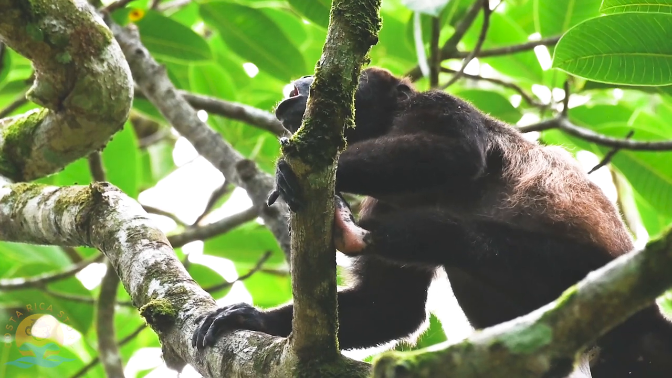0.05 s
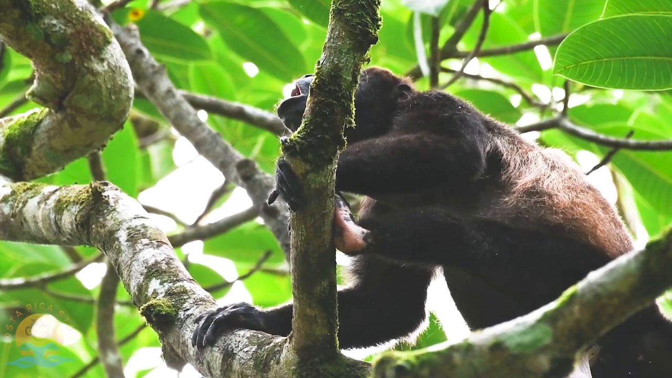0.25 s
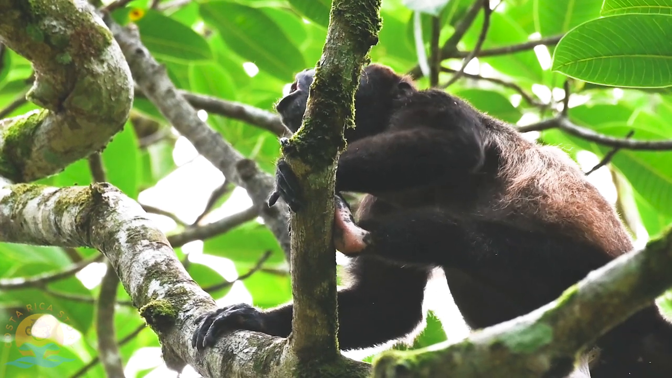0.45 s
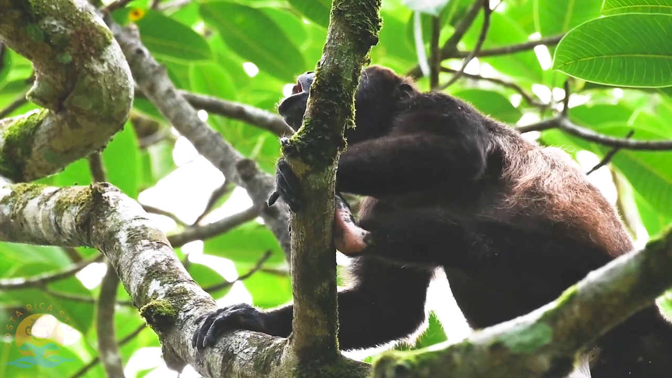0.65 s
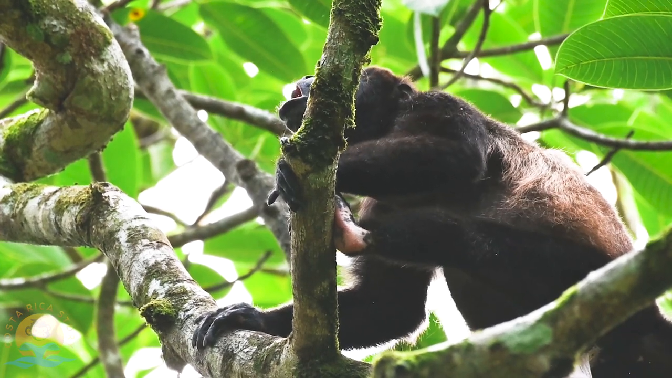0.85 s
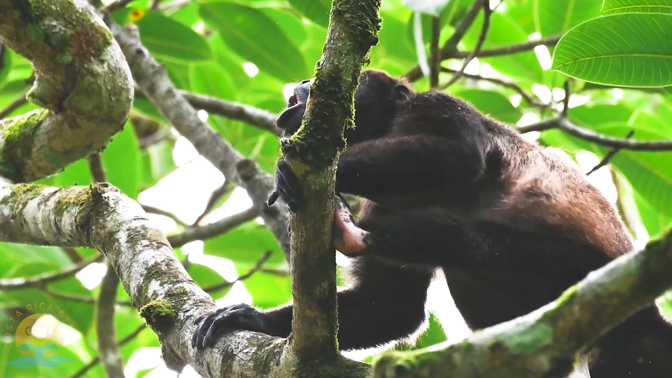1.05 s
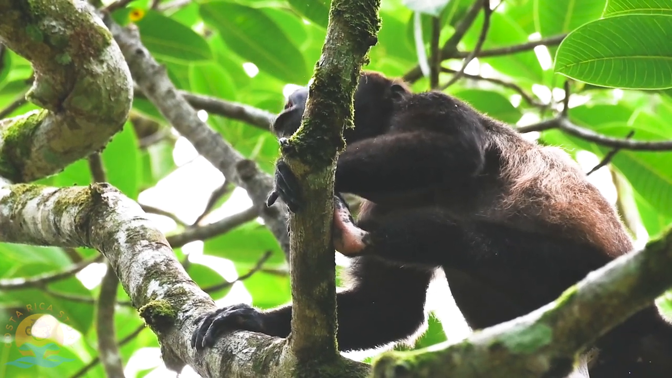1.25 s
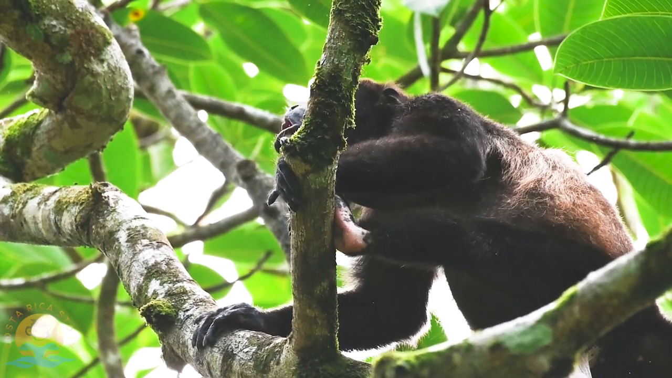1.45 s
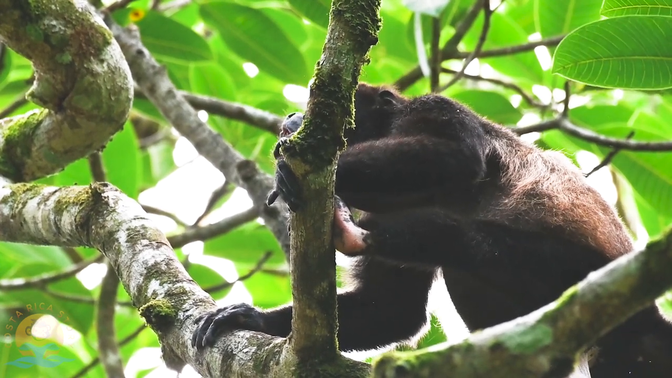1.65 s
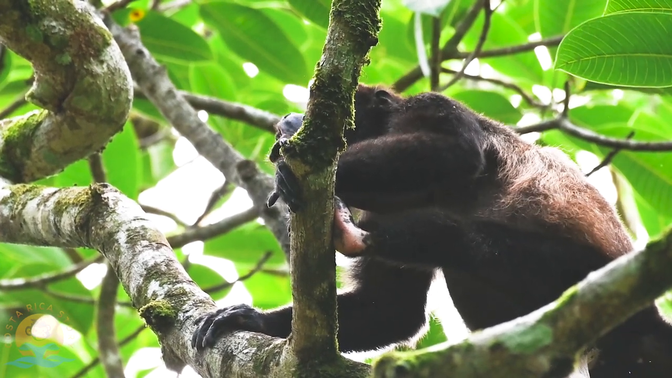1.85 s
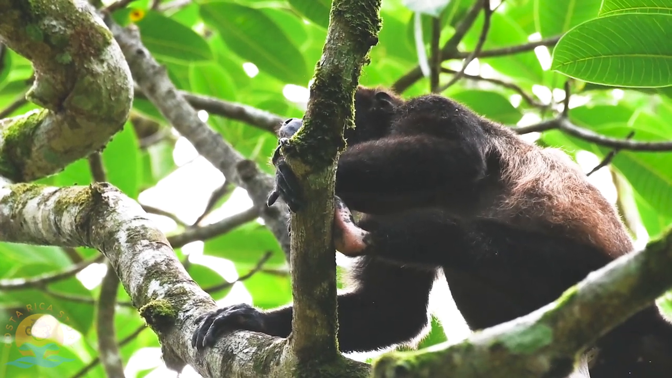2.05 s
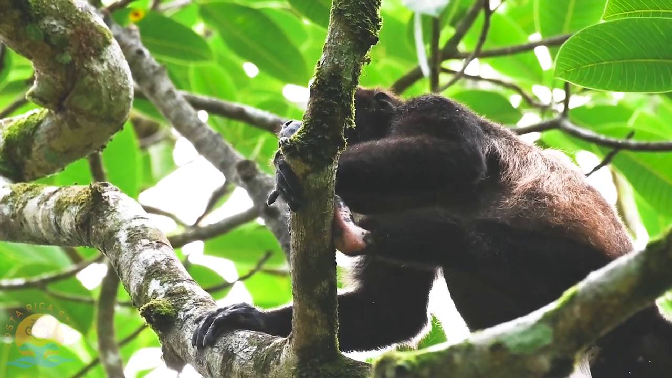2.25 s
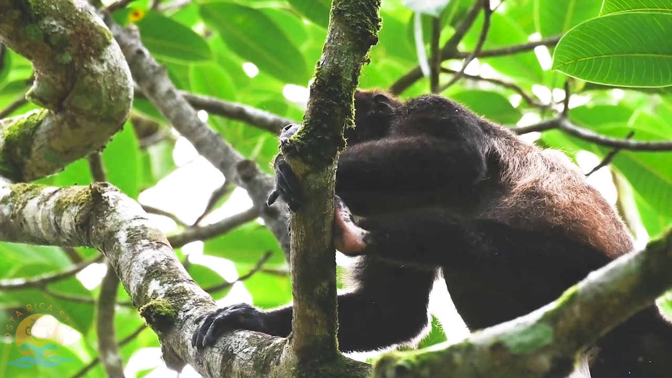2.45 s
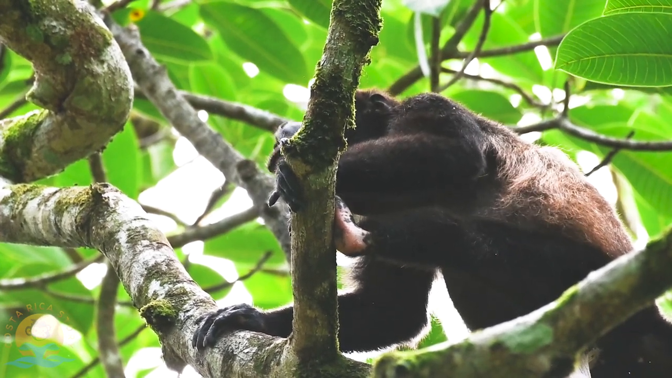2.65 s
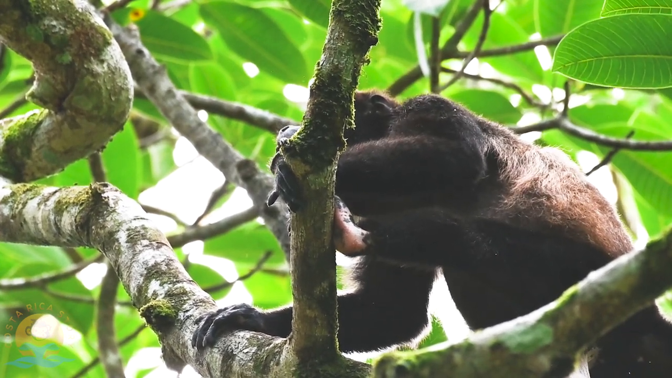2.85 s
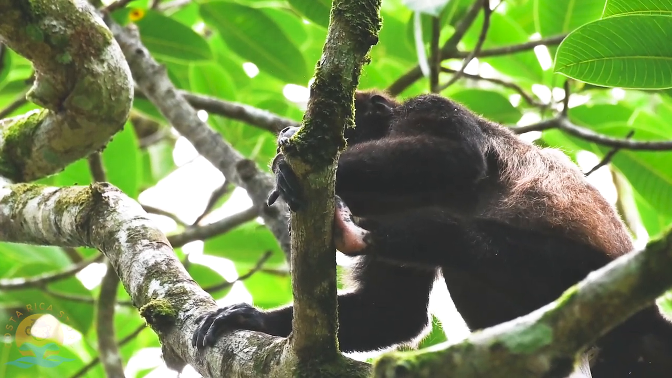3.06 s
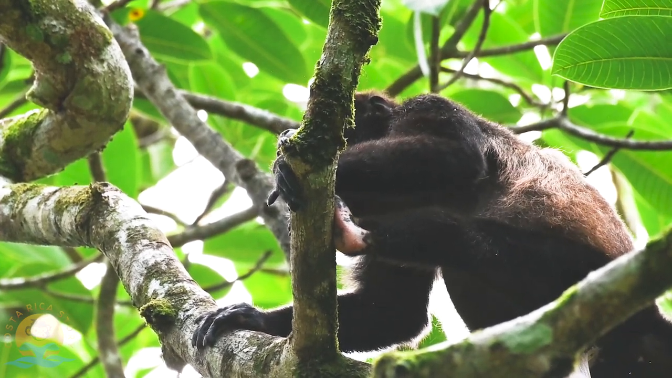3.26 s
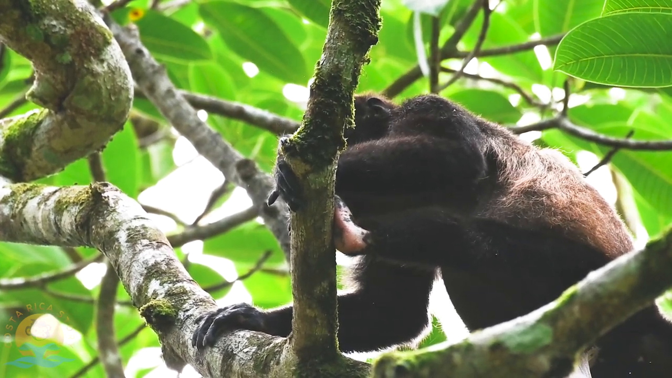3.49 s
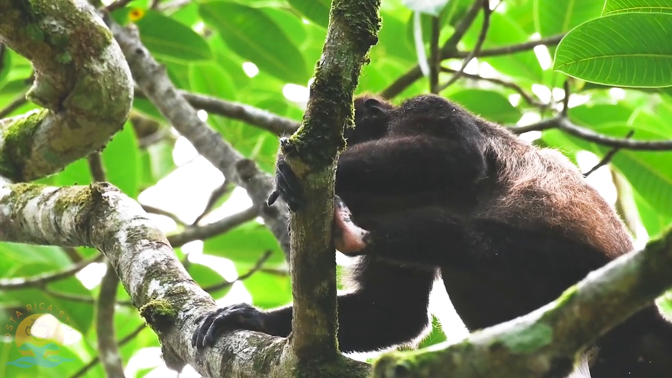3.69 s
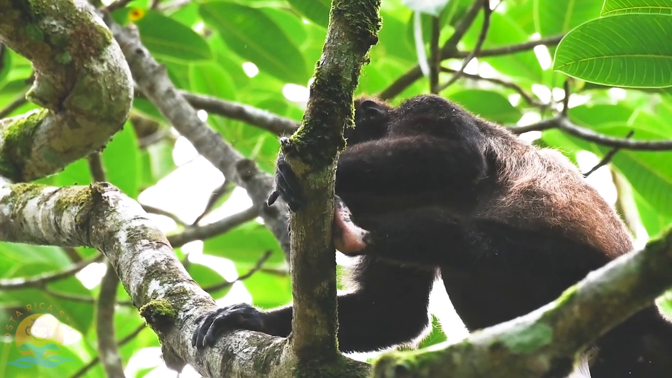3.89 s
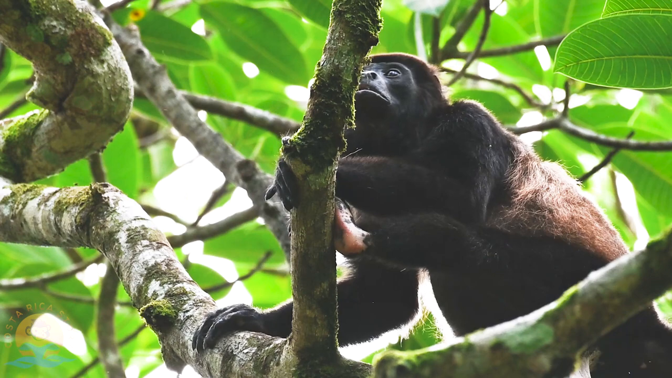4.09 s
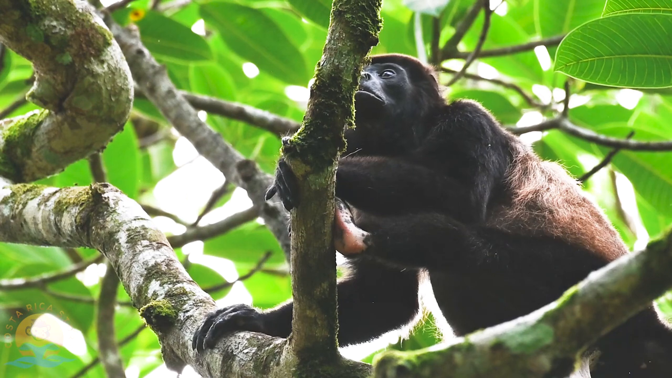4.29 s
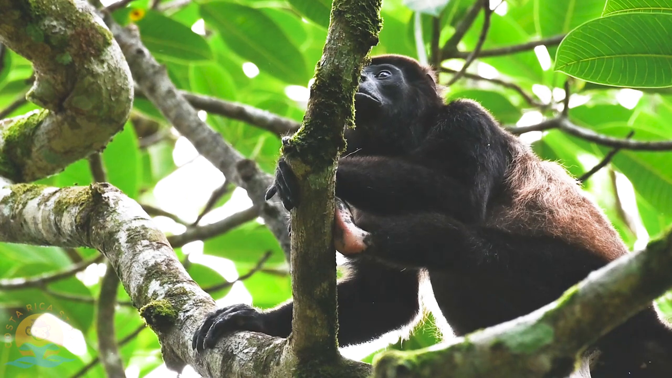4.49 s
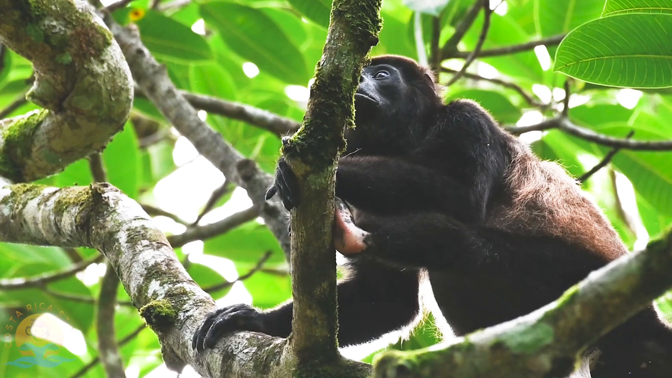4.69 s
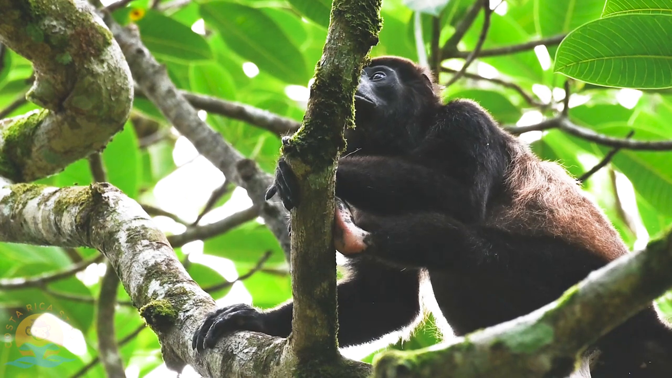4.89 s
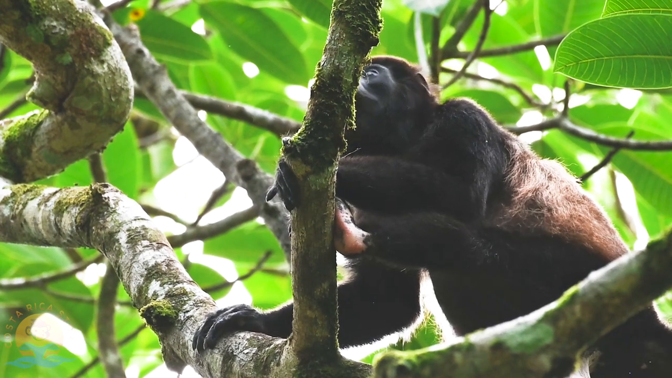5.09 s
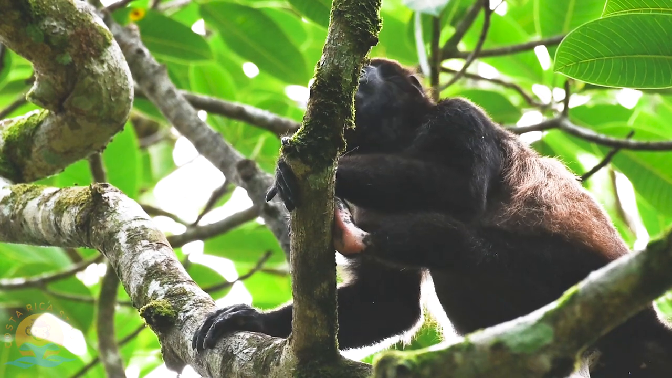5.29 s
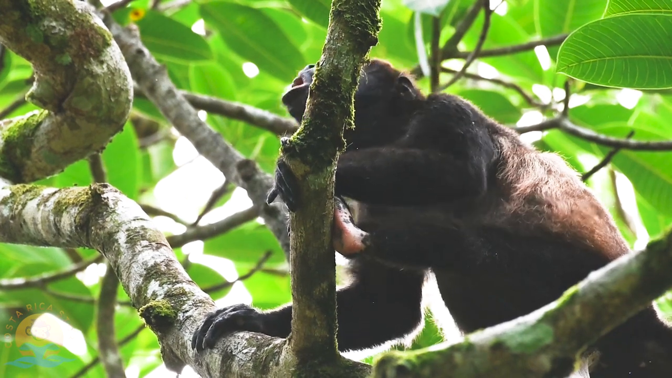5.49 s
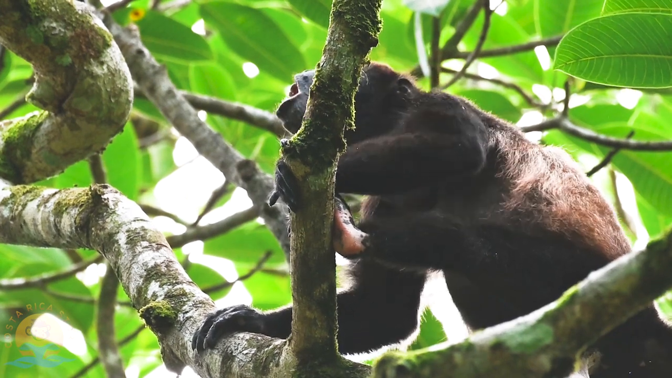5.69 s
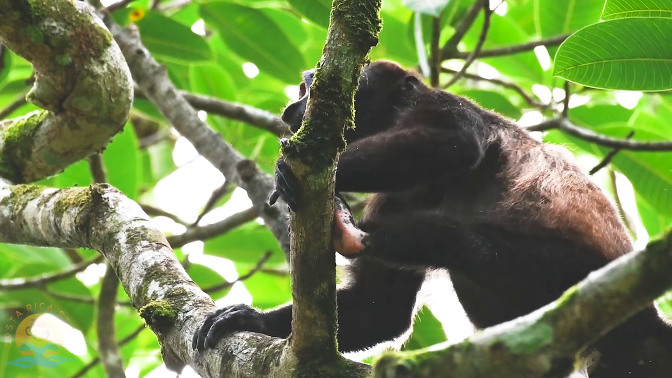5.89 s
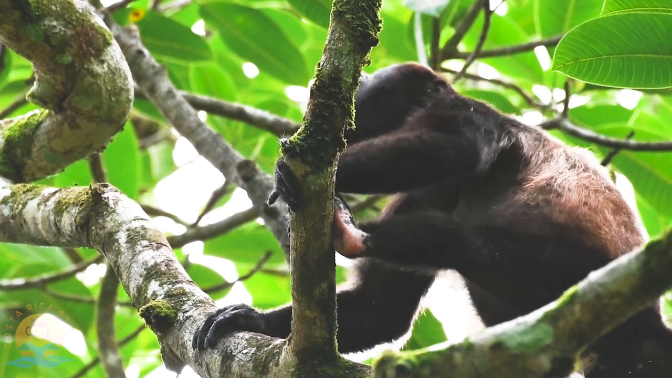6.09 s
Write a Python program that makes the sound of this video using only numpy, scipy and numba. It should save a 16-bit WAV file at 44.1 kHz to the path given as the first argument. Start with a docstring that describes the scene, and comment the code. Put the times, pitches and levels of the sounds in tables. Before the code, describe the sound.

A wide outdoor forest scene with constant high cicada buzzing, soft leafy air, a faint low hum and a katydid rasping in repeated short bursts around 5 kHz. A howler monkey, slightly left, is already finishing a grunt at 0 s. More follow at about 0.45, 1.13, 1.87 and 2.67 s, each roughly 0.3 s: a pulsed, throaty growl catches and opens into a hollow hoot near 400 Hz. The last two are weaker and rougher, and all leave a long woodland echo. At 3.3-3.6 s a low bird whistle dips and rises faintly; at 4.2-4.45 s there is a barely audible high peep. Gentle wind rumble swells around 4.5 s. From 5.2 s the monkey mutters quietly, then at 5.7 s launches a strong, wavering howl, dipping in quick pulses and rising slightly to about 450 Hz. Around 6.06 s a brighter, buzzing in-breath ends it abruptly.

```python
"""Howler monkey in a forest canopy

A howler monkey gives five grunts, the last ones weaker, mutters, then howls and draws a voiced in-breath.
Pulsed or sinusoidal fold sources excite throat resonances; a decaying noise response adds the forest echo.
A low bird whistle and a faint high peep are swept sines; cicadas are a periodic beat mixed with hiss.
A katydid rasps as throbbing resonant noise, over banded air noise, a low hum and rumbling gusts."""
import sys
import numpy as np
from scipy import signal
from scipy.fft import irfft
from scipy.io import wavfile
from scipy.ndimage import uniform_filter1d
from numba import njit

SR = 44100
rng = np.random.default_rng(int(sys.argv[2]) if len(sys.argv) > 2 else 0)


def put_to_file(sound):
    """Save the sound as 16-bit audio at rate SR, in the file named by the first command-line argument."""
    columns = np.atleast_2d(sound).T  # one column per channel
    safe = np.clip(columns, -1, 1)
    whole_steps = np.round(safe * 32767)
    wavfile.write(sys.argv[1], SR, whole_steps.astype(np.int16))


N = 270774


def from_db(db):
    """Logarithmic level: the amplitude gain of a level in dB."""
    return 10 ** (np.asarray(db) / 20)


def rms_one(x):
    """Normalisation: the signal scaled to unit rms."""
    return x / np.sqrt(np.mean(x ** 2) + 1e-20)


def in_time(rows):
    """Linear interpolation: the columns of a curve, first column t/s, at every sample."""
    s, *columns = np.transpose(rows)
    return [np.interp(np.arange(N) / SR, s, c) for c in columns]


def sounding(rows, fade_s=0.021):
    """Gating: 1 inside the span of a curve, with linear fades just outside it."""
    t, first, last = np.arange(N) / SR, rows[0][0], rows[-1][0]
    fade_in = np.clip((t - first) / fade_s + 1, 0, 1)
    fade_out = np.clip((last - t) / fade_s + 1, 0, 1)
    return fade_in * fade_out


def at_hz(points, hz):
    """Spectral interpolation: a curve read on a logarithmic frequency axis."""
    return np.interp(np.log(hz), np.log(np.array(points)[:, 0]), np.array(points)[:, 1])


def drift(rate_hz):
    """Random modulation: noise through a double low-pass pole at rate_hz, unit rms."""
    step = 40   # samples between computed values
    r = np.exp(-2 * np.pi * step * rate_hz / SR)
    noise = rng.standard_normal(N // step + 2002)
    slow = signal.lfilter([1], [1, -2 * r, r * r], noise)[2000:]
    return np.interp(np.arange(N) / step, np.arange(len(slow)), rms_one(slow))


@njit
def resonate(x, twice_cos, r):
    """Resonance: a two-pole filter whose centre moves sample by sample."""
    y = np.zeros(len(x))
    for i in range(2, len(x)):
        y[i] = x[i] - x[i - 2] + r * twice_cos[i] * y[i - 1] - r * r * y[i - 2]
    return y


def peak(x, hz, width_hz):
    """Cascaded resonance: one resonator applied twice for steep skirts, unit rms."""
    twice_cos = 2 * np.cos(2 * np.pi * hz / SR) * np.ones(N)
    r = np.exp(-np.pi * width_hz / SR)
    once = rms_one(resonate(x, twice_cos, r))
    return rms_one(resonate(once, twice_cos, r))


def evened(x, over_s):
    """Level compression: the short-time rms held near 1."""
    return x / np.sqrt(uniform_filter1d(x ** 2, int(over_s * SR)) + 0.015)


def beats(hz):
    """Phase accumulation: one click per cycle, and the phase in cycles."""
    cycles = np.cumsum(hz * np.ones(N)) / SR + rng.random()
    return np.diff(np.floor(cycles), prepend=np.floor(cycles[0])), cycles


# Grunts, each growling, catching, then singing: start t/s, catch t/s, end t/s, growl level/dB,
# sung level/dB, sac f/Hz, last sac f/Hz, growl mouth level/dB re voice, sung mouth level/dB re voice,
# rasp level/dB re voice, rasp pitch ratio re rest, whine level/dB at the catch
GRUNTS = [(-.18, -0.028, .11, -22, -16, 420, 394.4, 0, -0.5, -26.5, 0.96, -44),
          (0.451, .598, 0.76, -20, -16, 426, 397.8, 2.5, -1, -26, 0.99, -40),
          (1.133, 1.269, 1.413, -22, -18.5, 434, 387, 3.5, 1, -27, 0.97, -49),
          (1.869, 1.999, 2.17, -24, -26, 418, 381.6, 2, 8, -22.5, 1.04, -56),
          (2.667, 2.791, 2.93, -27.5, -29.5, 408, 330, 4.5, 2, -47, 1.0, -75)]
# Growl: times after the start, levels re growl level (silence, first push, slight swell up to the catch)
ONSET_S, SWELL_S, ONSET_DB, PUSH_DB, GROWL_RISE_DB = 0.036, 0.092, -28, -6, 2
# Sung part: times after the catch, levels re sung level (held, mouth opens, breath runs out)
HOLD_S, OPEN_S, HOLD_DB, OPEN_DB, END_DB = 0.0449, 0.089, -2, -10, -18.5
# Mouth offsets added to the mouth levels of the table
MOUTH_GROWL_DB, MOUTH_CATCH_DB, MOUTH_SHUT_DB, MOUTH_OPEN_DB, MOUTH_END_DB = -10, -10.5, -9.5, -0.5, -12
ACCENT_S = 0.0075   # spread of a brief level change, and step from growl to sung level
SAC_DROP = 0.94   # the sac slackens after the catch: pitch ratio re growl
RASP_ONSET_DB, RASP_END_DB = -1.5, 11.5   # rasp lags the voice in and out
WHINE_DB_PER_S = 230   # the whine falls away on both sides of the catch
GROWL_CLEAR, SUNG_CLEAR = 0.35, 0.9   # share of clear tone
LOCKS_FROM_DB, LOCKS_OVER_DB = -29, 6   # weak grunts fail to lock


def grunt(start, catch, end, growl_db, sung_db, hz, last_hz, mouth_db, sung_mouth_db,
          rasp_db, rasp_pitch, whine_db):
    """Source-filter control: t/s, level/dB, mouth/dB, sac f/Hz, rasp/dB, rasp pitch, clear share, whine/dB."""
    s = np.array([start, start + ONSET_S, start + SWELL_S, catch,
                  catch + ACCENT_S, catch + HOLD_S, catch + OPEN_S, end])
    growl_levels = growl_db + np.array([ONSET_DB, PUSH_DB, 0, GROWL_RISE_DB])
    sung_levels = sung_db + np.array([0, HOLD_DB, OPEN_DB, END_DB])
    db = np.r_[growl_levels, sung_levels]
    mouth_offset = ([MOUTH_GROWL_DB] * 3 + [MOUTH_CATCH_DB] + [MOUTH_SHUT_DB] * 2
                    + [MOUTH_OPEN_DB, MOUTH_END_DB])
    mouth = np.where(s > catch, sung_mouth_db, mouth_db) + mouth_offset
    locking = np.clip((sung_db - LOCKS_FROM_DB) / LOCKS_OVER_DB, 0, 1)
    clear = np.where(s > catch, SUNG_CLEAR * locking, GROWL_CLEAR)
    sac = np.interp(s, [catch, catch + HOLD_S, end], [hz, hz * SAC_DROP, last_hz])
    rasp = rasp_db + np.interp(s, [start, catch, end], [RASP_ONSET_DB, 0, RASP_END_DB])
    whine = whine_db - WHINE_DB_PER_S * abs(s - catch)
    return np.transpose([s, db, mouth, sac, rasp, rasp_pitch + 0 * s, clear, whine])


# Mutters: start t/s, peak t/s, last point t/s, level/dB, sac f/Hz, mouth level/dB re voice
MUTTERS = [(5.184, 5.205, 5.31, -41, 340, -11), (5.234, 5.254, 5.22, -35, 336, 0),
           (5.407, 5.536, 5.545, -34, 395, -2.5), (5.552, 5.566, 5.6, -40, 389.4, 6),
           (5.618, 5.64, 5.67, -32, 420, -13)]
MUTTER_EDGE_DB, MUTTER_RASP_DB = -12.5, -19.5   # first and last point re peak; rasp re voice


def mutter(start, top, end, db, hz, mouth_db):
    """Amplitude envelope: the controls of one soft growl, as in grunt, with inaudible whine."""
    return np.array([(s, db + edge_db, mouth_db, hz, MUTTER_RASP_DB, 1, GROWL_CLEAR, -99)
                     for s, edge_db in [(start, MUTTER_EDGE_DB), (top, 0), (end, MUTTER_EDGE_DB)]])


# Howl: t/s, level/dB, mouth level/dB re voice, sac f/Hz, rasp level/dB re voice, whine level/dB
HOWL = [(5.675, -55, 5, 386, -16, -68), (5.695, -32.5, -1, 390.6, -20, -63),
        (5.727, -17, -16, 402.7, -28.5, -54), (5.78, -25.5, 2, 435.5, -18, -36),
        (5.825, -19, -2.5, 435.4, -23, -35.5), (5.87, -22, -3, 440.3, -18, -38),
        (5.909, -19, -3.5, 446, -20.5, -35), (5.975, -17, -8, 445.7, -23.5, -43),
        (6.03, -26.5, -5, 450.4, -20.5, -57), (6.07, -31, -6, 444, -21, -70)]
# Brief dips and one late surge of the howl: t/s, level change/dB
HOWL_ACCENTS = [(5.76, -3.5), (5.804, -9), (5.86, -5.5), (6.028, 4.5)]
# Chest resonances of the growl: f/Hz, width/Hz, level/dB re growl, before the clear-tone scaling
CHEST = [(174.5, 34, -26), (264, 120, -19.5), (613.5, 38, -10), (893, 160, -20.5)]
# Rasp resonances: f/Hz at rest, width/Hz, level/dB relative to one another
RASP = [(1322, 30, 0.5), (3262, 180, 2.5), (3606, 52, 3), (3810, 136, 5), (5190, 115, 6.5), (5580, 90, 1.5),
        (6420, 51, -13)]
GRUNT_CATCH_DB = -2
HOWL_CLEAR = 0.95   # share of clear tone
CLEAR_PER_DB, CLEAR_S = 0.06, 0.026   # dips roughen the howl, the surge clears it: share per dB, spread
GROWL_HZ, GROWL_JITTER, GROWL_BREATH = 145.2, 0.09, 0.91   # pulse rate, its relative spread, puff gain
SAC_WIDTH_HZ, MOUTH_WIDTH_HZ = 70, 140
MOUTH_RATIO = 1.845   # mouth resonance over sac resonance
MOUTH_LOCK_POWER = 2.5   # the mouth band keeps less clear tone: share raised to this power
THIRD_DB = -29   # third harmonic of the clear tone
WHINE_HZ, WHINE_WIDTH_HZ = 2125, 60


def monkey():
    """Source-filter voice: growl pulses ring the throat; folds locked on the sac give a clear tone."""
    howl = np.array([(s, db, mouth, hz, rasp, 1, HOWL_CLEAR, whine)
                     for s, db, mouth, hz, rasp, whine in HOWL])
    calls = [grunt(*row) for row in GRUNTS] + [mutter(*row) for row in MUTTERS] + [howl]
    db, mouth_db, sac_hz, rasp_db, rasp_pitch, clear, whine_db = in_time(np.vstack(calls))
    db, mouth_db = uniform_filter1d([db, mouth_db], SR // 90)   # breath cannot jump

    t = np.arange(N) / SR
    accents = HOWL_ACCENTS + [(row[1], GRUNT_CATCH_DB) for row in GRUNTS]
    db = db + sum(change_db * np.exp(-((t - s) / ACCENT_S) ** 2) for s, change_db in accents)
    clear_change = sum(CLEAR_PER_DB * change_db * np.exp(-((t - s) / CLEAR_S) ** 2)
                       for s, change_db in HOWL_ACCENTS)
    clear = np.clip(clear + clear_change, 0, 1)

    clicks, cycles = beats(GROWL_HZ * (1 + GROWL_JITTER * drift(29.4)))
    puffs = rng.standard_normal(N) * (1 + np.cos(2 * np.pi * cycles))   # air jets with each opening
    source = rms_one(clicks * from_db(4.45 * drift(76))) + GROWL_BREATH * puffs
    growl = evened(peak(source, sac_hz, SAC_WIDTH_HZ), 0.019)
    mouth_growl = evened(peak(source, MOUTH_RATIO * sac_hz, MOUTH_WIDTH_HZ), 0.03)
    chest = sum(from_db(d) * peak(source, hz, w) * (-1) ** k   # alternating sign
                for k, (hz, w, d) in enumerate(CHEST))
    growl += (1.2 - 0.4 * clear) * chest   # loose folds boom more

    phase = 2 * np.pi * np.cumsum(sac_hz * (1 + 0.0043 * drift(26.4))) / SR
    tone = np.sin(phase) * from_db(1.4 * drift(34))
    tone += from_db(THIRD_DB + 2 * drift(32)) * np.sin(3 * phase)
    locked = clear ** MOUTH_LOCK_POWER
    mouth_tone = from_db(2.0 * drift(38)) * np.sin(2 * phase)
    mouth = np.sqrt(1 - locked) * mouth_growl + np.sqrt(2 * locked) * mouth_tone

    hiss = rng.standard_normal(N) * (1.33 + np.sin(phase))
    rasp = sum(from_db(d + 2 * drift(44)) * peak(hiss, hz * rasp_pitch, w) for hz, w, d in RASP) / 2
    whine = evened(peak(hiss, WHINE_HZ, WHINE_WIDTH_HZ), 0.067) * from_db(whine_db)

    voice = np.sqrt(1 - clear) * growl + np.sqrt(2 * clear) * tone   # power crossfade
    voice += from_db(mouth_db) * mouth + from_db(rasp_db) * rasp
    gate = sum(sounding(c) for c in calls).clip(0, 1)
    return gate * (from_db(db) * voice + whine)


# In-breath: t/s, fundamental f/Hz, level/dB
IN_BREATH = [(6.055, 339, -50), (6.075, 337.6, -36.5), (6.11, 339.4, -24.5), (6.14, 325.4, -26)]
# In-breath partials: multiple of the fundamental, level/dB re in-breath
IN_BREATH_ORDERS = [(1, -0.5), (2, -6), (3, -7.5), (4, -13), (5, -27), (6, -5.5), (7, -28.5), (8, -48),
                    (9, -17.5), (10, -10.5), (11, -6.5), (12, -13.5), (13, -13.5), (14, -13.5), (15, -26),
                    (16, -24), (17, -27), (18, -7.5), (19, -18)]
IN_BREATH_ROUGH_DB = 3.5   # flutter spread approached by the highest partials


def in_breath():
    """Harmonic series: indrawn air buzzes the folds lower and brighter; upper partials flutter most."""
    hz, db = in_time(IN_BREATH)
    phase = 2 * np.pi * np.cumsum(hz * (1 + 0.0046 * drift(63))) / SR
    stack = 0
    for k, partial_db in IN_BREATH_ORDERS:
        flutter_db = IN_BREATH_ROUGH_DB * np.tanh(k / 6) * drift(63)
        stack = stack + from_db(partial_db + flutter_db) * np.sin(k * phase + k * k)
    return np.sqrt(2) * from_db(db) * sounding(IN_BREATH) * stack


# Low bird whistle: t/s, f/Hz, level/dB before wavering
BIRD = [(3.298, 924, -48), (3.312, 722, -47), (3.326, 541, -53), (3.346, 517, -52), (3.368, 690, -47),
        (3.395, 785, -42), (3.45, 805, -51), (3.54, 845, -38), (3.578, 856, -49)]
# Faint high peep: t/s, f/Hz, level/dB before wavering
FAR_PEEP = [(4.2, 3350, -52), (4.3, 3420, -57), (4.45, 3370, -58)]


def whistle(rows):
    """Frequency modulation: a pure tone follows a pitch curve while its level wavers."""
    hz, db = in_time(rows)
    tone = np.sin(2 * np.pi * np.cumsum(hz) / SR)
    return np.sqrt(2) * from_db(db + 3.7 * drift(26)) * sounding(rows) * tone


# Reverberation time of the trunks: f/Hz, time for a 60 dB decay t/s
ECHO_T60 = [(100, 1.3), (400, 1.28), (900, 1.08), (2000, 1.63), (6000, 1.4)]
ECHO_DB, ECHO_SIDE_DB, LEAF_DB = 0.5, -13.5, -20   # side is re echo
RIGHT_LAG_S = 0.00007


def forest(x):
    """Reverberation: trunks scatter a long echo; leaves add a short bright blur, opposite on each side."""
    t, edges = np.arange(2 * SR) / SR, 100 * 2 ** np.arange(0, 7.1, 0.5)
    white = rng.standard_normal((2, 2 * SR))
    tail = 0
    for low, high in zip(edges, edges[1:]):
        band = signal.sosfilt(signal.butter(2, [low, high], "band", fs=SR, output="sos"), white)
        decay = from_db(-60 * t / at_hz(ECHO_T60, np.sqrt(low * high)))
        tail = tail + band * decay * np.clip(t / 0.17, 0, 1)   # gradual build-up
    tail = tail * from_db([[ECHO_DB], [ECHO_DB + ECHO_SIDE_DB]]) / np.sqrt(SR * 0.1)
    leaves = signal.lfilter(*signal.butter(1, 900, "high", fs=SR), white[0, ::-1])
    tail[1] += leaves * from_db(LEAF_DB - 60 * t / 0.033) / np.sqrt(SR * 0.006)
    mid, side = signal.fftconvolve(x[None], tail, axes=1)[:, :N]
    # the tree stands a little to the left, so the right side hears it later
    right = np.interp(np.arange(N) - RIGHT_LAG_S * SR, np.arange(N), x + mid - side)
    return np.array([x + mid + side, right])


# Cicada chorus: t/s, level/dB (rms is 3 dB higher), body resonance f/Hz, left over right level/dB
CICADAS = [(0.0, -38, 8130, 1.0), (3.71, -38.5, 8210, 1), (4.72, -40, 8540, -1.5), (5.23, -39, 8410, -1.5),
           (5.78, -39.5, 8530, -2), (5.92, -42.5, 8307, -2), (6.14, -40, 8356, -2.0)]
# Singers: first beat rate f/Hz, last beat rate f/Hz, fade-out from t/s, relative level/dB,
# left over right level/dB within the chorus
SINGERS = [(93.5, 95.0, 4.0, 0, 9), (78.3, 79.3, 4.0, -1, -9), (82.8, 85.6, 6.2, -1, -2)]
CICADA_WIDTH_HZ, CICADA_LOW_HZ = 2290, 5780   # body resonance width, high-pass corner
CICADA_HISS = 0.47   # power share of far singers, blurred into hiss


def cicadas():
    """Periodicity: a tymbal beat, smeared alike each time by leaves, makes a slowly changing line comb."""
    db, body_hz, chorus_pan_db = in_time(CICADAS)
    out, t, size = np.zeros((2, N)), np.arange(N) / SR, 4096
    halves = np.array([[0.5], [-0.5]])   # left and right share of a pan
    for first, last, stop_s, level_db, pan_db in SINGERS:
        rate_hz = np.interp(t, [0, stop_s], [first, last])
        _, cycles = beats(rate_hz * (1 + 0.000409 * drift(2.037)))
        partials = rng.standard_normal((2, 2, 180)) + 1j * rng.standard_normal((2, 2, 180))
        beat = irfft(partials, size)   # two shapes of one beat for each side
        read = [[np.interp(cycles % 1, np.arange(size) / size, shape, period=1) for shape in side]
                for side in beat]
        turn = np.cumsum(2.936 + drift(0.5)) / SR   # the shape wanders from one to the other
        song = np.array([a * np.cos(turn) + b * np.sin(turn) for a, b in read])
        gain = from_db(level_db + pan_db * halves + 1.0 * drift(24))
        out += rms_one(song) * gain * sounding([[0], [stop_s]], 0.12)
    near = np.sqrt(1 - CICADA_HISS) * evened(rms_one(out), 0.61)
    out = near + np.sqrt(CICADA_HISS) * rng.standard_normal((2, N))
    out = signal.sosfilt(signal.butter(4, CICADA_LOW_HZ, "high", fs=SR, output="sos"), out)
    body = rms_one(np.array([peak(side, body_hz, CICADA_WIDTH_HZ) * side.std() for side in out]))
    return np.sqrt(2) * from_db(db + chorus_pan_db * halves) * body


# Katydid bursts: start t/s, end t/s, level/dB before the band-pass and a 3 dB lift, pitch leap f/Hz
KATYDID = [(0.495, 0.907, -56, 202), (1.067, 1.414, -53, 100), (1.598, 1.726, -53, 50.13),
           (1.712, 1.895, -49.5, 450), (2.154, 2.5, -50.5, 152.4), (2.89, 3.099, -49, 503),
           (3.179, 3.418, -51.5, 50.2), (3.51, 3.716, -52, 198), (3.78, 4.007, -49, 500),
           (4.043, 4.326, -50.5, 248), (4.337, 5.05, -54, 99), (5.199, 5.651, -51.5, 251),
           (5.718, 6.141, -46.5, 100)]
KATYDID_HZ, KATYDID_WIDTH_HZ = 4930, 790
KATYDID_STROKES_HZ, KATYDID_DEPTH = 25, 0.1
KATYDID_FADE_DB = -3.5   # sag over one burst


def katydid():
    """Stridulation: wing strokes throb in a wide resonance; bursts leap briefly in pitch and sag in level."""
    t, effort, leap_hz = np.arange(N) / SR, 0, 0
    for start, end, db, hz in KATYDID:
        sag_db = KATYDID_FADE_DB * np.clip((t - start) / (end - start), 0, 1)
        gate = sounding([[start + 0.0044], [end - 0.03]], 0.044)
        effort = effort + gate * from_db(db + sag_db)
        leap_hz = leap_hz + hz * np.exp(-((t - start - 0.06) / 0.021) ** 2)
    _, cycles = beats(KATYDID_STROKES_HZ * (1 + 0.141 * drift(3.6)))
    teeth = rng.standard_normal((2, N)) * (1 + KATYDID_DEPTH * np.sin(2 * np.pi * cycles))
    rasp = np.array([peak(side, KATYDID_HZ + leap_hz, KATYDID_WIDTH_HZ) for side in teeth])
    band = signal.butter(4, [4400, 5900], "band", fs=SR, output="sos")
    return np.sqrt(2) * effort * signal.sosfilt(band, rasp)


# Air spectrum: f/Hz, relative density level/dB per Hz
AIR = [(40, -6), (85, -1.5), (130, -4.5), (250, -3), (500, -4.5), (1200, -3.5), (2500, -7), (4200, -8.5),
       (6000, -23), (11000, -46), (15500, -17.5)]
# Left-right likeness of the air: f/Hz, correlation (1 alike, 0 independent)
LIKENESS = [(40, 0.96), (300, 0.92), (700, 0.85), (1400, 0.46), (2800, 0), (5000, 0), (15000, 0)]
AIR_DB = -45
HUM_HZ, HUM_WIDTH_HZ, HUM_DB = 80.24, 7.9, -58.5


def air(patchy_db):
    """Banded diffuse noise: leaves and far insects in half-octave bands, with a wavering low hum."""
    out, edges = 0, 20 * 2 ** np.arange(0, 10.1, 0.5)
    white = rng.standard_normal((2, 2, N))
    for k, (low, high) in enumerate(zip(edges, edges[1:])):
        band = signal.butter(2, [low, high], "band", fs=SR, output="sos")
        mid, side = signal.sosfilt(band, white[k % 2])   # neighbouring bands use separate noise
        centre_hz = np.sqrt(low * high)
        alike = np.clip(at_hz(LIKENESS, centre_hz), -1, 1)
        gain = from_db(at_hz(AIR, centre_hz) + patchy_db * drift(3.0))
        out = out + gain * (np.sqrt(1 + alike) * mid + np.sqrt(1 - alike) * side * [[1], [-1]])
    hum = peak(rng.standard_normal(N), HUM_HZ, HUM_WIDTH_HZ)
    return from_db(AIR_DB) * rms_one(out) + from_db(HUM_DB) * hum


# Gusts on the microphone: t/s, level/dB
WIND = [(0, -86), (1, -62.5), (3.6, -70), (4.1, -59), (4.5, -55), (5.3, -58), (6.14, -69)]


def wind():
    """Band-limited turbulence: a low lumpy rumble, nearly alike on both sides."""
    db, = in_time(WIND)
    band = signal.butter(2, [42, 90], "band", fs=SR, output="sos")
    mid, side = signal.sosfilt(band, rng.standard_normal((2, N)))
    return from_db(db) * rms_one(mid + 0.1 * side * [[1], [-1]])


def scene():
    """Superposition: voices through the forest, with insects, air and wind around them."""
    voices = monkey() + in_breath() + whistle(BIRD) + whistle(FAR_PEEP)
    return forest(voices) + cicadas() + katydid() + air(patchy_db=1.0) + wind()


def record(dry):
    """Low-pass filtering: a steep elliptic filter cuts the top above 15.7 kHz."""
    return signal.sosfilt(signal.ellip(12, 0.5, 70, 15700, fs=SR, output="sos"), dry)


dry = scene()
out = record(dry)
put_to_file(out)
```